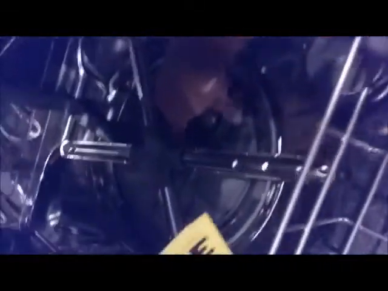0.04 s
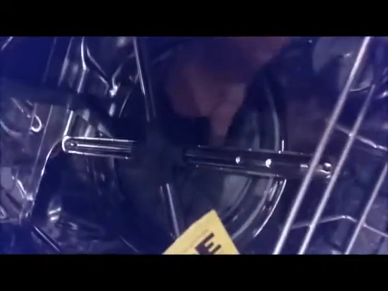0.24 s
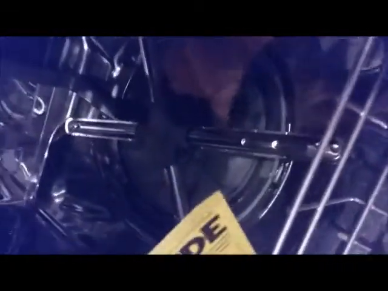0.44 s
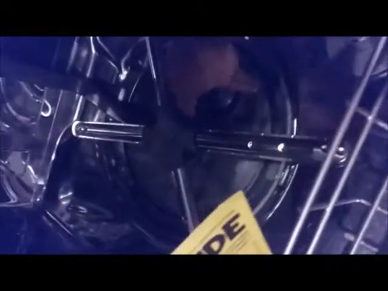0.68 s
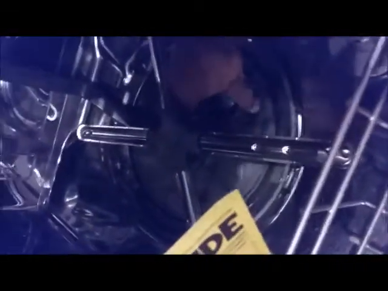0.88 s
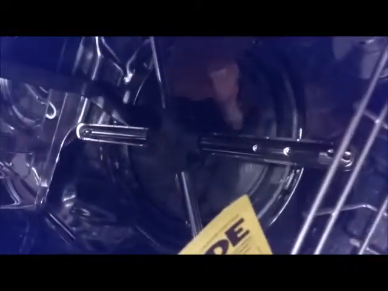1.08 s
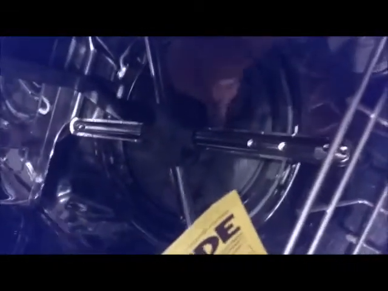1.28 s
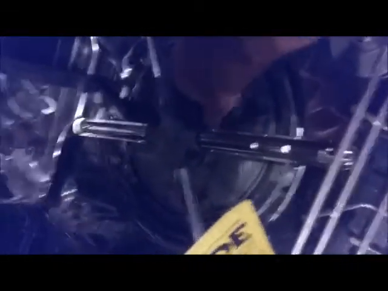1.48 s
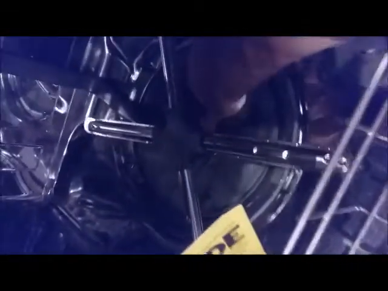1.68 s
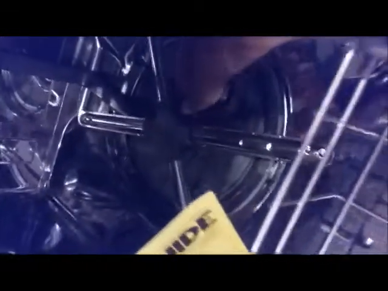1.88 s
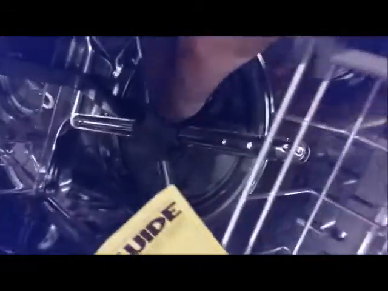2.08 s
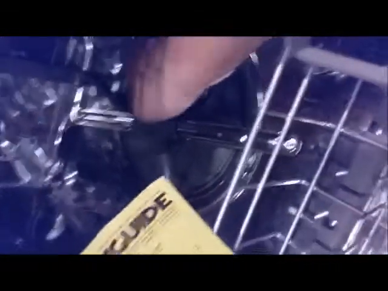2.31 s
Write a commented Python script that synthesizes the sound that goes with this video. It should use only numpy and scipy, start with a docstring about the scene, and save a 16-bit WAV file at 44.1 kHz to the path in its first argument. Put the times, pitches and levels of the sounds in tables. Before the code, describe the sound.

Close up in a quiet room, a plastic filter knocks twice inside a dishwasher, ringing the steel tub with a low boom. It scrapes, squeaks and clicks while turning, knocks once more, then leaves only soft handling bumps and rustle.

```python
"""A plastic filter knocks hard three times in the sump of a steel dishwasher tub, close to the microphone.
A hand turns it: it clicks lightly, and its rim scrapes, sticks and squeaks. Each contact clacks in the
plastic, echoes in the cavity, rings the tub and booms its floor panel. Soft bumps and a faint rustle of
handling run between the knocks and go on after them, over a quiet room."""
import sys
import numpy as np
from scipy import signal
from scipy.fft import rfft, irfft, next_fast_len
from scipy.io import wavfile
from scipy.ndimage import map_coordinates

SR = 44100
rng = np.random.default_rng(int(sys.argv[2]) if len(sys.argv) > 2 else 0)


def materialize(psi):
    """Save the field psi as 16-bit PCM at rate SR to the path in sys.argv[1].

    A 1-D psi becomes a single channel; in a 2-D psi each row is a channel.
    """
    bounded = np.clip(np.atleast_2d(psi).T, -1, 1)
    quanta = np.round(bounded * 32767).astype(np.int16)
    wavfile.write(sys.argv[1], SR, quanta)


N = 108045


def amp(db):
    """Decibels to gain."""
    return 10 ** (np.asarray(db) / 20)


def unit(x):
    """Scale to rms 1."""
    return x / np.sqrt(np.mean(x ** 2) + 1e-20)


def along(points, hz):
    """Interpolate (frequency, value) points on a log frequency axis."""
    point_hz, values = np.transpose(points)
    return np.interp(np.log(hz + 1), np.log(point_hz + 1), values)


def filtered(x, response):
    """Apply a gain given as a function of frequency."""
    size = next_fast_len(len(x) + 8192)
    return irfft(rfft(x, size) * response(np.fft.rfftfreq(size, 1 / SR)), size)[:len(x)]


def coloured_noise(colour, count):
    """Noise shaped by a spectrum table, rms 1."""
    return unit(filtered(rng.standard_normal(count), lambda f: amp(along(colour, f))))


def wobble(rate_hz, count):
    """Smooth random curve through rate_hz knots a second."""
    return map_coordinates(rng.standard_normal(N // 10), [np.arange(count) * rate_hz / SR + 2])


def add(track, time_s, sound):
    """Mix a sound into the track."""
    part = track[round(time_s * SR):][:len(sound)]
    part += sound[:len(part)]


def mode(hz, t60_s, rise_s):
    """One decaying resonance."""
    t = np.arange(SR // 2) / SR
    return np.sin(2 * np.pi * hz * t) * amp(-60 * t / t60_s) * (1 - np.exp(-t / rise_s))


def ringing(modes, boost_db, scatter_db=1.5, max_t60_s=0.36):
    """Modes struck at once in alternating polarity, their levels scattered on each strike."""
    out = 0
    for k, (hz, db, t60_s) in enumerate(modes):
        gain = amp(db + boost_db(hz) + scatter_db * rng.normal())
        out += (-1) ** k * gain * mode(hz, min(t60_s, max_t60_s), rise_s=0.0005)
    return out


def favour(hz, favoured_hz, width_oct=0.026):
    """Narrow bell, peak 1: a contact point excites some modes more than the rest."""
    return np.exp(-0.5 * (np.log2((hz + 1) / favoured_hz) / width_oct) ** 2)


# room spectrum (frequency [Hz], relative level [dB])
ROOM_COLOUR = [(30, -9.5), (110, 3.5), (200, -9.5), (700, -9.5), (2500, -22.5), (4500, -21.5),
               (9000, -24.5), (16000, -30)]


def room(level_db=-76):
    """Steady low noise of a quiet room."""
    return amp(level_db) * coloured_noise(ROOM_COLOUR, N)


def friction(colour_db, count, grains_per_s=320, grain_db=-8):
    """Sliding hiss with tiny catches, rms 1."""
    grains = (rng.random(count) < grains_per_s / SR) * rng.standard_normal(count)
    excitation = rng.standard_normal(count) + amp(grain_db) * unit(grains)
    return unit(filtered(excitation, lambda f: amp(colour_db(f))))


# rim friction spectrum (frequency [Hz], relative level [dB])
SCRAPE_COLOUR = [(300, -27), (1400, -11.5), (1850, -7), (2400, -1.5), (3500, -8.5), (4500, -1),
                 (6000, -9.5), (9000, -21.5), (15500, -29.5)]


def rim_scrape(count, peak_db=6, half_width_hz=45):
    """The rim scrapes in its seat and excites the modes of the plastic."""
    def colour_db(f):
        peaks = [1 / (1 + ((f - hz) / half_width_hz) ** 2) for hz, _, _ in PLASTIC_MODES]
        return along(SCRAPE_COLOUR, f) + peak_db * np.max(peaks, axis=0)
    return friction(colour_db, count)


# skin friction spectrum (frequency [Hz], relative level [dB])
SKIN_COLOUR = [(60, 6), (150, 15), (300, 13), (700, 14), (1500, 5), (2200, 3), (3000, -4), (4500, 1.5),
               (7000, 1), (10000, -2.5), (15500, -0.5)]
# hand strokes (start [s], end [s], skin level [dB], skin tilt [dB/oct], scrape level [dB])
STROKES = [(0.068, 0.135, -60.5, -2, -65), (0.181, .26, -55, -1.5, -59.5), (.31, 0.55, -56, 0, -54),
           (0.571, .70, -56, -0.5, -60), (0.696, 0.869, -51, -1.5, -58), (.88, 0.999, -50.5, -1.5, -58.5),
           (1.031, 1.10, -70.5, 1.5, -83.5), (1.168, 1.19, -42.5, -2, -48), (1.19, 1.305, -47.5, -3, -54),
           (1.298, 1.381, -53, -1.5, -61), (1.421, 1.449, -57.5, -0.5, -70.5), (1.506, 1.572, -58, -2, -85),
           (1.72, 1.795, -57.5, -1.5, -63.5), (1.782, 1.853, -57, -1, -58),
           (1.838, 1.864, -55.5, -0.5, -52), (1.889, 1.929, -63.5, 1, -73), (1.946, 2.152, -59, 0, -67),
           (2.133, 2.179, -53.5, 0.5, -58.5), (2.239, 2.269, -53.5, -1, -72),
           (2.31, 2.401, -57.5, -0.5, -63.5), (2.409, 2.47, -51.5, -1.5, -58.5)]


def rustle(rise_s=0.014, release_t60_s=0.2, waver_db=1.3):
    """In each stroke skin slides on plastic and the rim scrapes."""
    out, t = np.zeros(N), np.arange(SR // 2) / SR
    for start_s, end_s, skin_db, tilt_db_oct, scrape_db in STROKES:
        since_end_s = np.maximum(t - (end_s - start_s), 0)
        envelope = (1 - np.exp(-t / rise_s)) * amp(-60 * since_end_s / release_t60_s)
        colour_db = lambda f: along(SKIN_COLOUR, f) + tilt_db_oct * np.log2(np.maximum(f, 500))
        skin = amp(skin_db) * friction(colour_db, len(t))
        rim = amp(scrape_db) * rim_scrape(len(t))
        waver = amp(waver_db * wobble(rate_hz=60, count=len(t)))
        add(out, start_s, envelope * waver * (skin + rim))
    return out


# rim squeaks (time [s], length [s], level [dB])
SQUEAKS = [(0.612, 0.017, -49), (0.634, 0.058, -60)]


def squeaks(pitch_hz=7000, waver_hz=45, waver_db=2.5):
    """The turning rim sticks and gives a thin, wavering squeak."""
    out = np.zeros(N)
    for time_s, length_s, db in SQUEAKS:
        count = int(length_s * SR)
        hz = pitch_hz + waver_hz * wobble(rate_hz=340, count=count)
        gain = amp(db + waver_db * wobble(rate_hz=135, count=count))
        tone = np.sin(2 * np.pi * np.cumsum(hz) / SR)
        add(out, time_s, gain * signal.windows.tukey(count, 0.5) * tone)
    return out


# bump noise spectrum (frequency [Hz], relative level [dB])
PUFF_COLOUR = [(25, -11.5), (60, -1.5), (110, 6), (200, -9.5), (600, -13.5), (1200, -26), (4000, -54)]
# handling bumps (time [s], level [dB], upper mode re lower [dB])
BUMPS = [(.105, -52.5, -19), (.232, -36, -14), (0.347, -44, -12.5), (0.533, -42.5, -8), (.585, -32, -28.5),
         (0.643, -34.5, -23.5), (0.683, -48, -13), (0.723, -35.5, -28), (.845, -37, -7), (0.904, -49, 1),
         (1.005, -39.5, -11), (1.077, -56, -16), (1.325, -39, -9.5), (1.366, -44.5, -18),
         (1.426, -41.5, -19), (1.517, -43, -16), (1.566, -49, -14), (1.738, -39, -9.5), (1.793, -27, -6),
         (1.84, -32.5, -8.5), (1.906, -48, -26), (1.946, -29, -15.5), (1.993, -36, -9), (2.030, -32.5, -19),
         (2.059, -29, -21), (2.099, -51, -21), (2.135, -34, -10), (2.161, -30, -13), (2.238, -38, -5.5),
         (2.263, -39, -3.5), (2.318, -33, -14), (2.359, -37.5, -4), (2.419, -31, -13)]


def bumps(lower_hz=100.7, upper_hz=283.8, pitch_scatter=0.024, peak_s=0.015, puff_db=-14.5):
    """Soft pushes swell and fade in two low, well damped modes, with a puff of dull noise."""
    out, t = np.zeros(N), np.arange(SR // 4) / SR
    swell = (t / peak_s * np.exp(1 - t / peak_s)) ** 1.67
    for time_s, db, upper_db in BUMPS:
        lower_detune, upper_detune = 1 + pitch_scatter * rng.standard_normal(2)
        lower = np.sin(2 * np.pi * lower_hz * lower_detune * t)
        upper = amp(upper_db) * np.sin(2 * np.pi * upper_hz * upper_detune * t)
        puff = amp(puff_db) * coloured_noise(PUFF_COLOUR, len(t))
        add(out, time_s, amp(db) * swell * (lower + upper + puff))
    return out


# floor panel modes (frequency [Hz], relative level [dB], t60 [s])
PANEL_MODES = [(124.5, 3.5, 0.17), (105.9, -10.5, 0.2), (135.6, -1.5, 0.18), (61.6, -23.5, 0.24)]


def panel_boom():
    """The tub's floor panel booms in slowly rising low modes."""
    return sum(amp(db) * mode(hz, t60_s, rise_s=0.012) for hz, db, t60_s in PANEL_MODES)


# steel tub modes (frequency [Hz], relative level [dB], t60 before the cap in ringing [s])
TUB_MODES = [(223.7, -14.5, 0.18), (288, -8, 0.17), (341.2, -11.5, 0.4), (445, -12, 0.34),
             (520.5, -4, 0.13), (614, -11, 0.24), (693.5, -5, 0.17), (752.3, -3, 0.15), (808.2, -2, 0.19),
             (850, -7.5, .2), (1016, -14, .35), (1167, -17, 0.33), (1370, -18, 0.11)]


def tub_ring(favoured_hz, favour_db=12):
    """The struck steel tub rings, boosted near the favoured frequency."""
    return 0.5 * ringing(TUB_MODES, lambda f: favour_db * favour(f, favoured_hz))


# plastic filter modes (frequency [Hz], relative level [dB], t60 [s])
PLASTIC_MODES = [(1387, -12.5, .13), (1557, -15, 0.087), (1839.4, -13.5, .13), (1961, -16.5, 0.037),
                 (3284, -12.5, 0.064), (3270, -23, 0.047), (3858, -30, 0.07), (4330, -11, 0.085),
                 (4540, -18.5, .13), (4940, -15, 0.15), (5390, -17, 0.064), (5980, -16.5, 0.081)]


def plastic_ring(slant_db, favoured_hz, gain_db=-3.5, favour_db=12):
    """The struck filter rings briefly in its high modes."""
    return ringing(PLASTIC_MODES, lambda f: gain_db + slant_db(f) + favour_db * favour(f, favoured_hz))


def dense_ring(colour_db, band_t60):
    """Countless close modes: rms 1 noise, then each band decays at its own rate."""
    count = SR // 2
    f = np.fft.rfftfreq(count, 1 / SR)
    phases = np.exp(2j * np.pi * rng.random(len(f)))
    noise = unit(irfft(amp(colour_db(f)) * phases))
    hz, t, bands = signal.stft(noise, SR, nperseg=256)
    decay = amp(-60 * t / along(band_t60, hz)[:, None])
    return signal.istft(bands * decay, SR)[1][:count]


# decay of the clack and of the cavity echo (frequency [Hz], t60 [s])
CLACK_T60 = [(300, 0.083), (1500, 0.076), (4500, 0.085), (12000, 0.046)]
ECHO_T60 = [(300, 0.48), (1500, .36), (4500, 0.28), (12000, 0.25)]


def clack(colour, slant_db, favoured_hz, echo_db, favour_db=8.5):
    """A short plastic clack and its longer echo in the cavity."""
    colour_db = lambda f: along(colour, f) + slant_db(f) + favour_db * favour(f, favoured_hz)
    return dense_ring(colour_db, CLACK_T60) + amp(echo_db) * dense_ring(colour_db, ECHO_T60)


def contacts(rows, colour, echo_db):
    """Each contact sounds the plastic, the tub and its floor panel together."""
    out = np.zeros(N)
    for time_s, plastic_db, tilt_db_oct, tub_db, boom_db, plastic_hz, tub_hz in rows:
        slant_db = lambda f: tilt_db_oct * np.log2(np.clip(f, 500, 7000) / 1500)
        plastic = clack(colour, slant_db, plastic_hz, echo_db) + plastic_ring(slant_db, plastic_hz)
        steel = amp(tub_db) * tub_ring(tub_hz) + amp(boom_db) * panel_boom()
        add(out, time_s, amp(plastic_db) * plastic + steel)
    return out


# click spectrum (frequency [Hz], relative level [dB])
CLICK_COLOUR = [(120, -36.5), (200, -5), (424, -8.5), (821, -6.5), (1250, -10.5), (1530, -4), (1680, -10),
                (1840, -8), (2610, -13), (4430, -6.5), (9060, -29), (14100, -37.5), (16000, -62)]
# light contacts (time [s], plastic gain [dB], tilt [dB/oct], tub gain [dB], boom gain [dB],
# favoured in plastic [Hz], favoured in tub [Hz])
CLICKS = [(.074, -62, -7, -51, -46, 1813, 442), (.201, -33.5, -1, -37.5, -44, 1568, 523),
          (.211, -32.5, -1.5, -40.5, -31.5, 1565, 536), (.7415, -33, 3.5, -38.5, -40, 1850, 854),
          (.800, -31.5, 0, -43, -44, 1886, 830), (.808, -38.5, 0, -42, -50, 4350, 810),
          (.820, -34.5, -3.5, -35.5, -34, 4410, 565), (.8745, -33.5, 1.5, -40, -32, 3350, 343),
          (.926, -40.5, -3.5, -46, -43, 1840, 840), (.965, -35, -1, -34, -31.5, 1565, 431),
          (.9815, -31, 0, -45.5, -46.5, 4720, 797), (1.514, -61.5, -3, -57.5, -53.5, 1850, 738),
          (1.729, -56.5, -4.5, -67, -69, 1850, 796), (1.789, -59, 6, -49.5, -60, 1850, 614),
          (1.818, -44, 0.5, -50.5, -44, 1860, 684), (1.846, -50.5, 1.5, -57, -61, 5390, 620),
          (1.946, -54.5, 0.5, -50, -67, 1800, 600), (2.052, -51, -4, -49, -55, 1470, 590),
          (2.239, -58, -1, -63, -63, 1860, 848)]


def clicks():
    """The filter clicks lightly as it turns, with little echo."""
    return contacts(CLICKS, CLICK_COLOUR, echo_db=-26)


# knock spectrum (frequency [Hz], relative level [dB])
KNOCK_COLOUR = [(120, -14), (200, -9), (254, -20), (519, -4.5), (635, -13), (821, -3), (1120, -13),
                (1560, -8), (1680, -17.5), (2090, -14.5), (2860, -22), (4430, -13.5), (9930, -33.5),
                (14300, -33), (16000, -43)]
# hard contacts (time [s], plastic gain [dB], tilt [dB/oct], tub gain [dB], boom gain [dB],
# favoured in plastic [Hz], favoured in tub [Hz])
KNOCKS = [(.2675, -31, -4.5, -36.5, -63, 4270, 810), (.2735, -34, 1, -27.5, -45, 1370, 950),
          (.2800, -18, -2, -28, -33, 3650, 858), (.2845, -19, -1.5, -37, -18.5, 4620, 860),
          (.2940, -27.5, -5, -22.5, -54, 1360, 1015), (.3240, -35, -3, -34.5, -43.5, 5100, 1005),
          (.4232, -18, 0, -24, -15.5, 1890, 875), (.4270, -22.5, -2.5, -20, -18, 4970, 298),
          (.4415, -27, -2, -36.5, -20.5, 1885, 700), (1.1850, -29, 1, -34.5, -53.5, 5430, 694),
          (1.1890, -31, 0, -30.5, -42.5, 5460, 754), (1.1928, -19, 1.5, -25.5, -31, 5270, 753),
          (1.1980, -18, -1, -22, -14, 1565, 523)]


def knocks():
    """The filter hits the sump three times, each knock a quick cluster of contacts."""
    return contacts(KNOCKS, KNOCK_COLOUR, echo_db=-14)


def scene():
    """Filter and handling over the quiet room, mono."""
    return (room() + knocks() + clicks() + bumps() + rustle() + squeaks())[None]


def record(dry, low_cut_hz=56, top_hz=16300):
    """The microphone sheds deep bass and everything above its band limit."""
    highpass = signal.butter(4, low_cut_hz, "high", fs=SR, output="sos")
    return filtered(signal.sosfilt(highpass, dry[0]), lambda f: f < top_hz)[None]


dry = scene()
out = record(dry)
materialize(out)
```